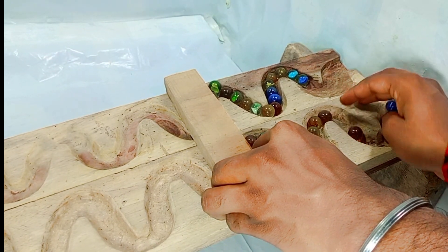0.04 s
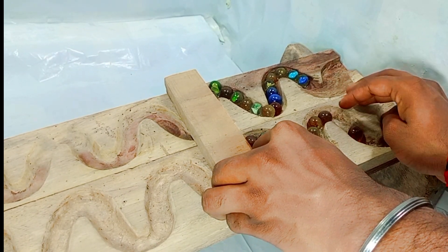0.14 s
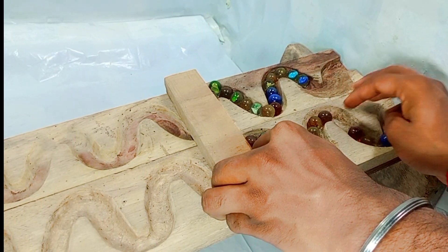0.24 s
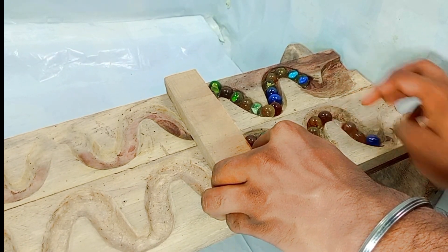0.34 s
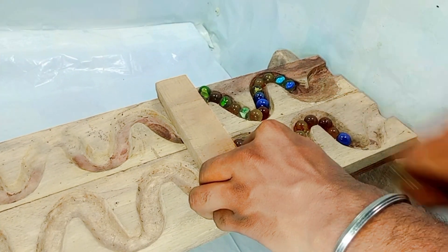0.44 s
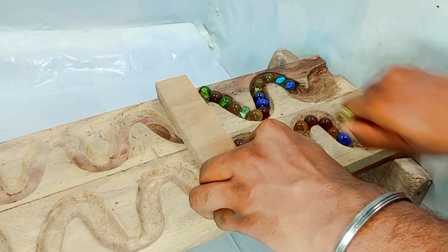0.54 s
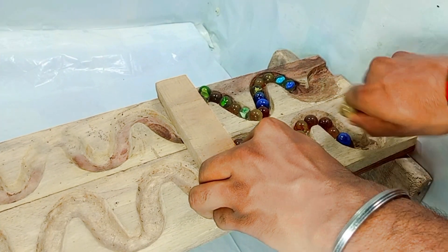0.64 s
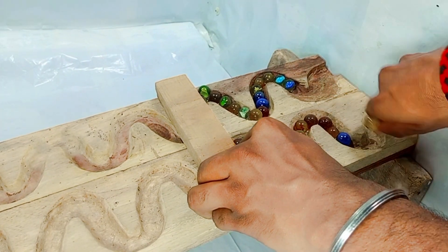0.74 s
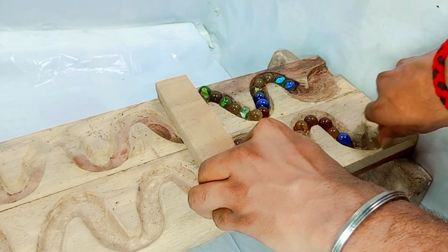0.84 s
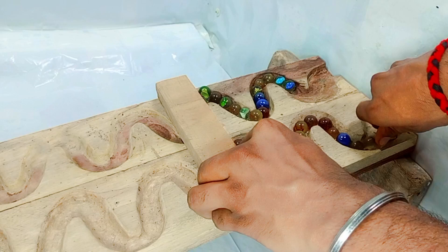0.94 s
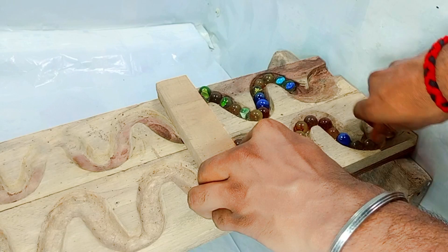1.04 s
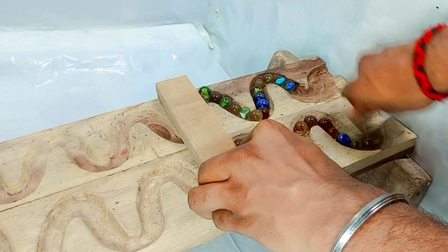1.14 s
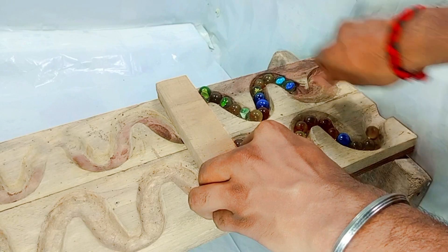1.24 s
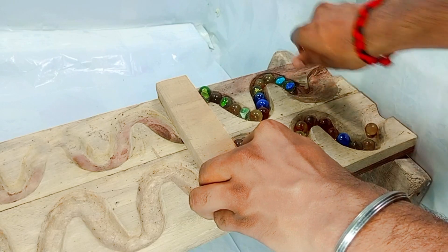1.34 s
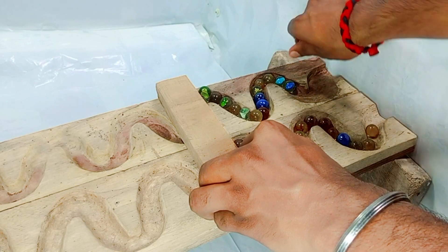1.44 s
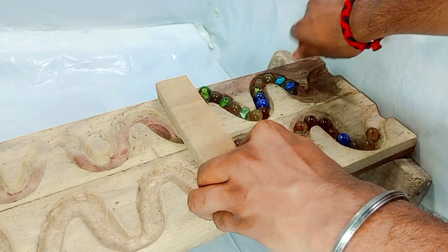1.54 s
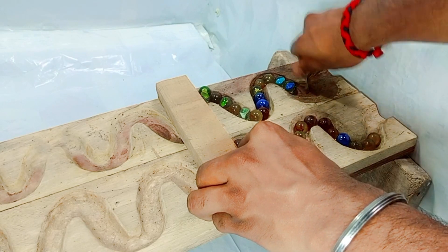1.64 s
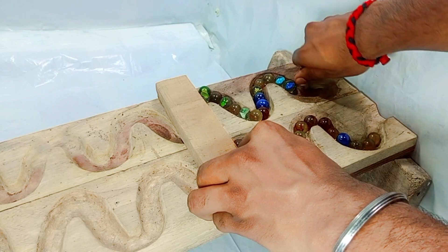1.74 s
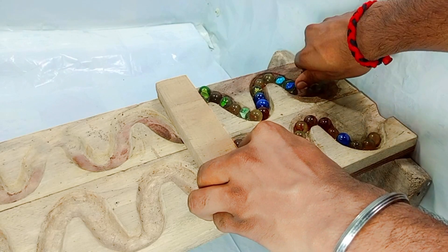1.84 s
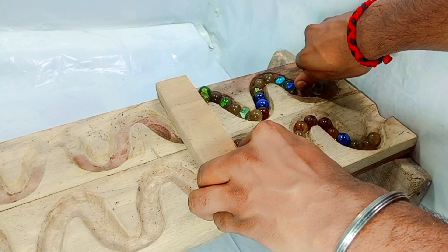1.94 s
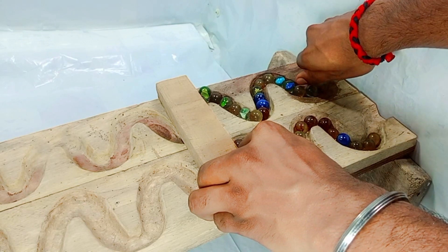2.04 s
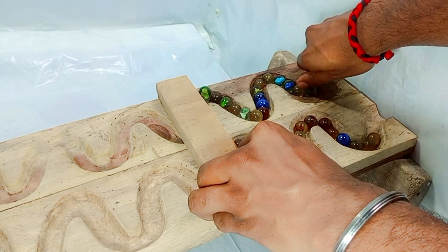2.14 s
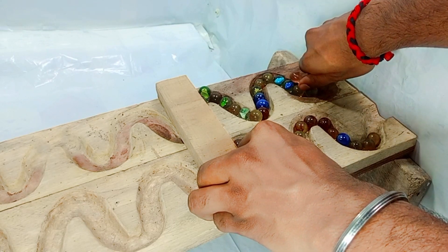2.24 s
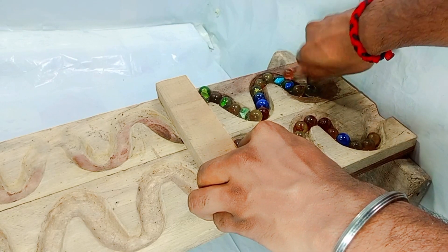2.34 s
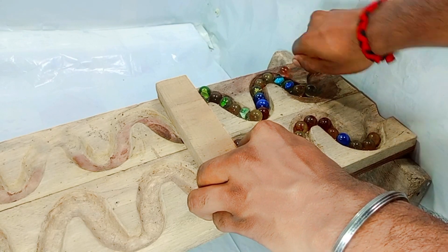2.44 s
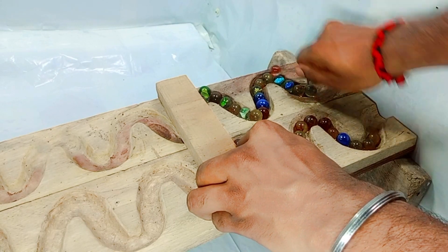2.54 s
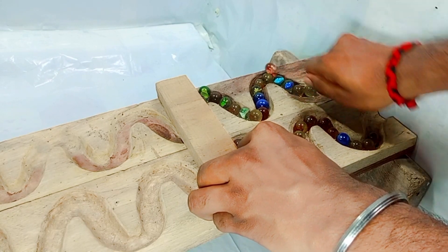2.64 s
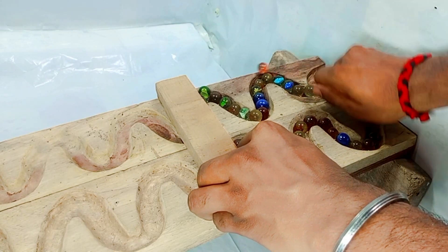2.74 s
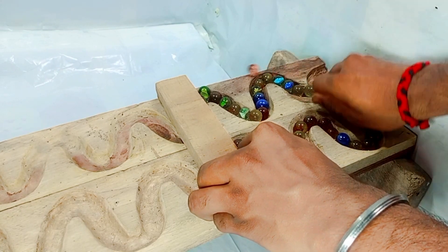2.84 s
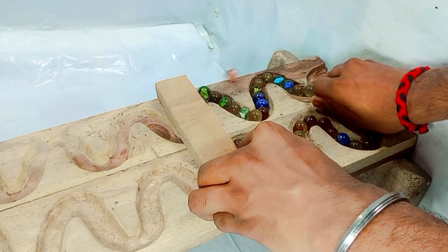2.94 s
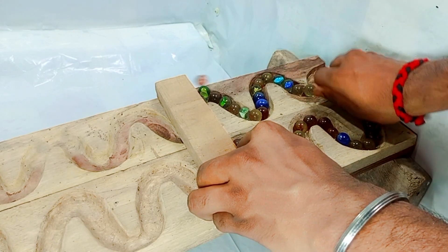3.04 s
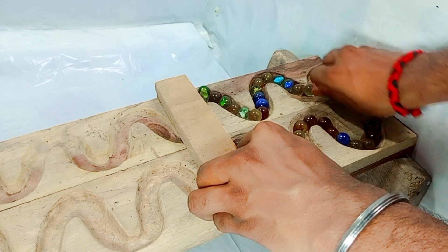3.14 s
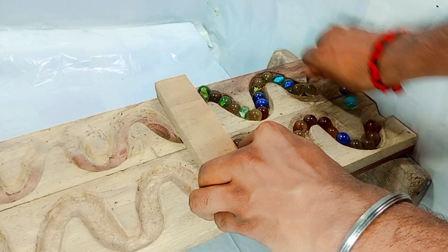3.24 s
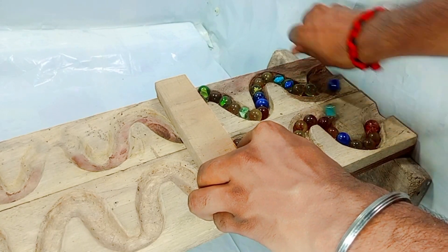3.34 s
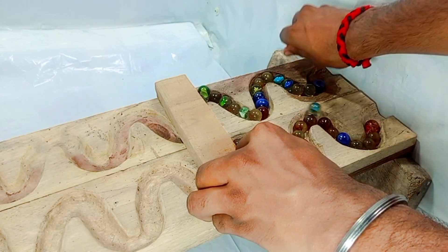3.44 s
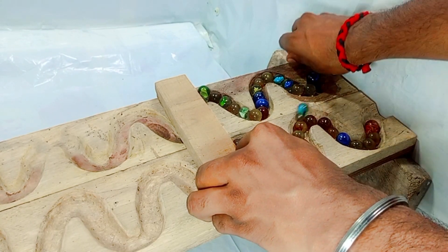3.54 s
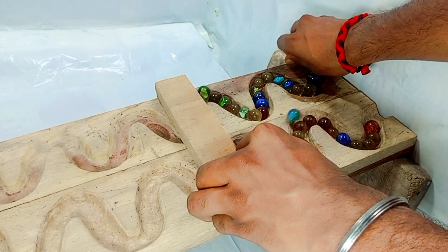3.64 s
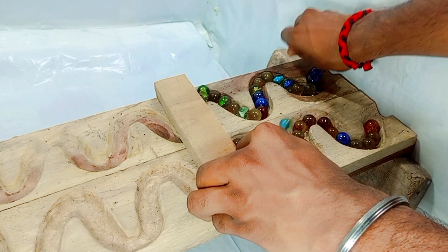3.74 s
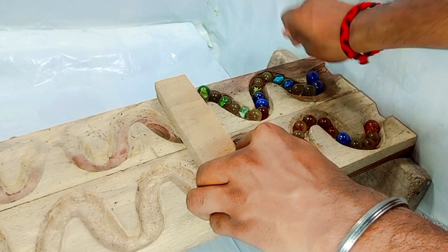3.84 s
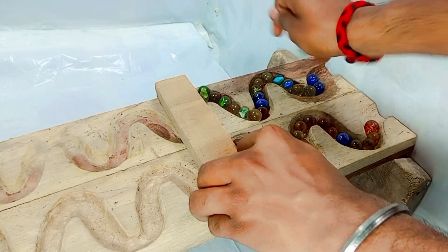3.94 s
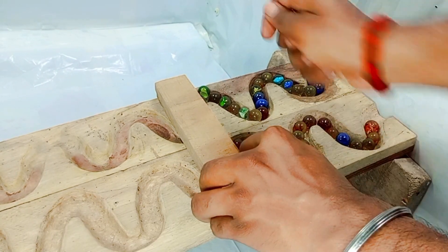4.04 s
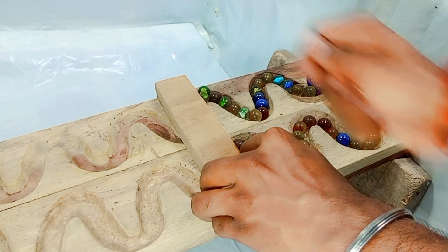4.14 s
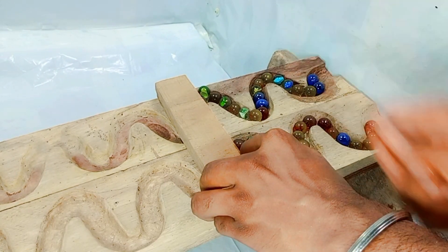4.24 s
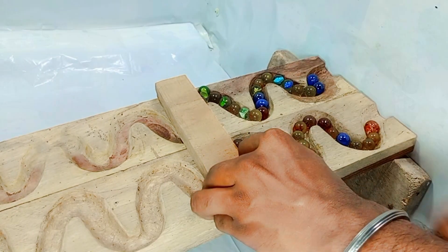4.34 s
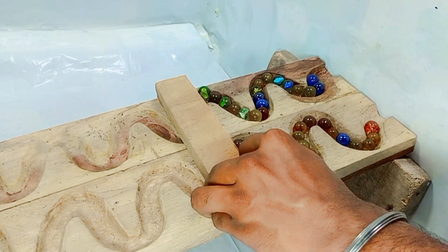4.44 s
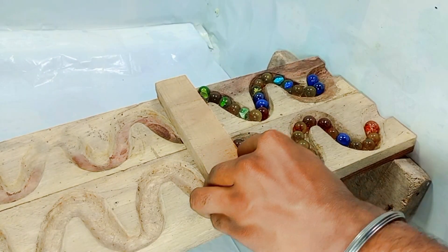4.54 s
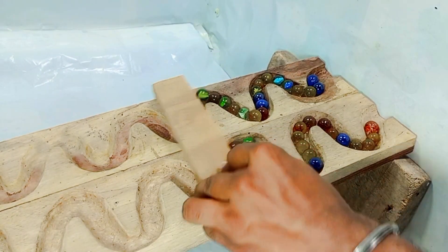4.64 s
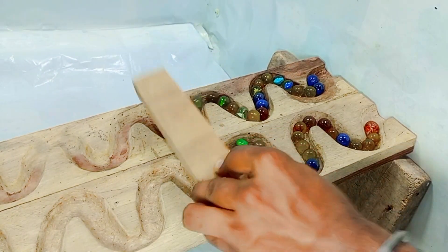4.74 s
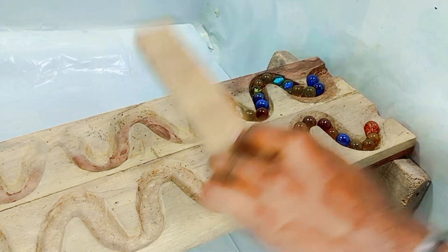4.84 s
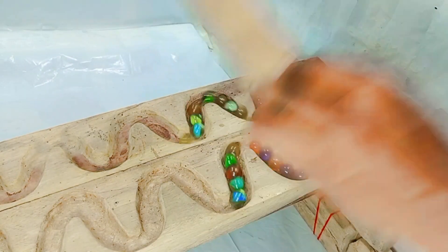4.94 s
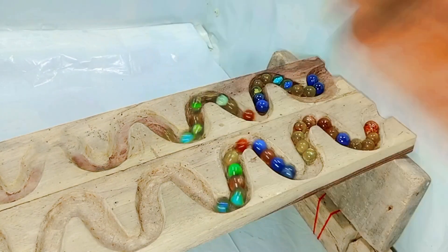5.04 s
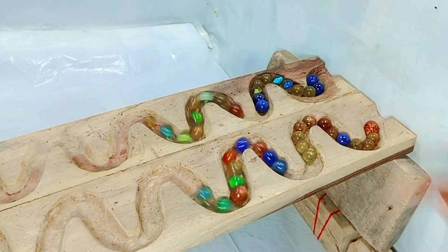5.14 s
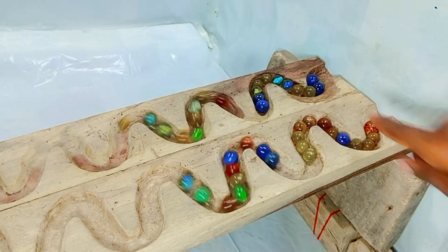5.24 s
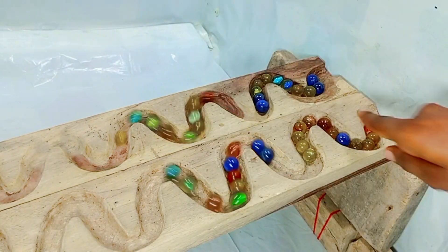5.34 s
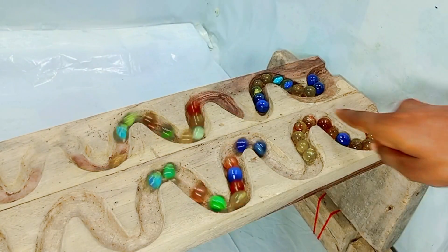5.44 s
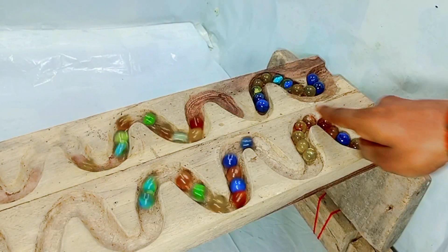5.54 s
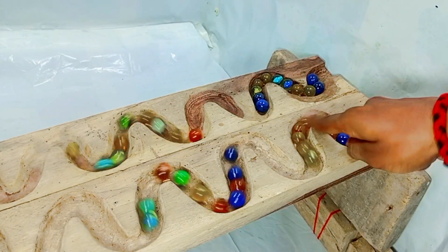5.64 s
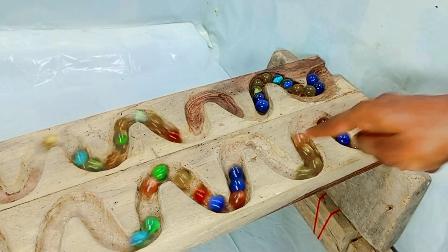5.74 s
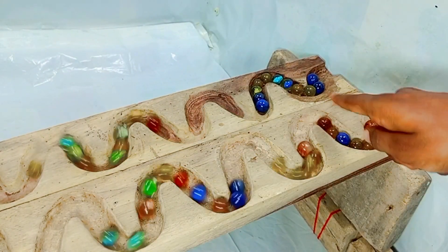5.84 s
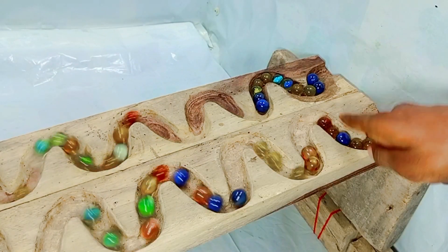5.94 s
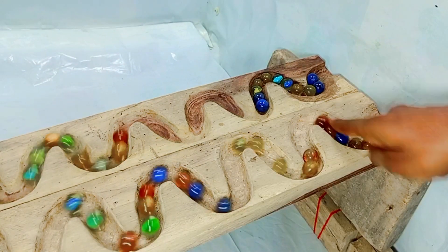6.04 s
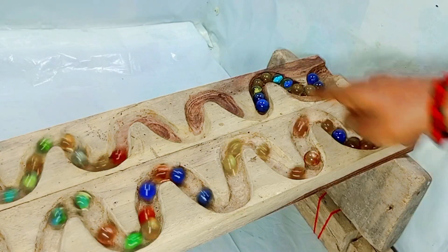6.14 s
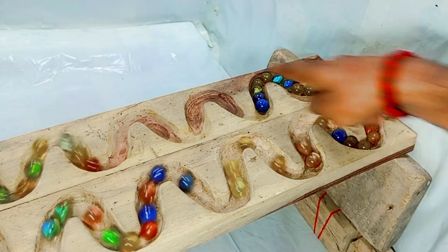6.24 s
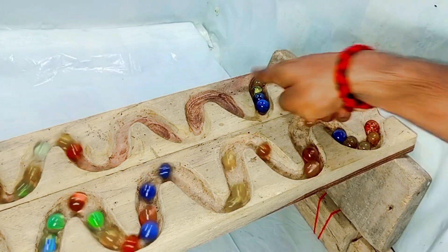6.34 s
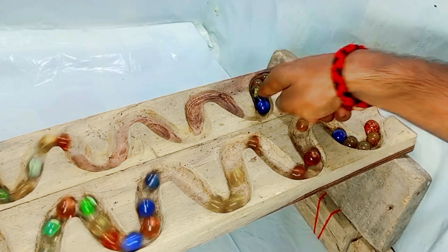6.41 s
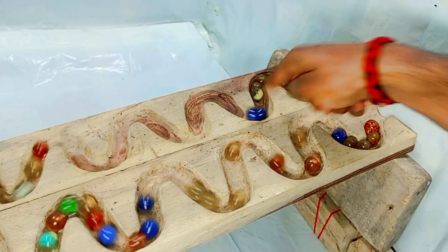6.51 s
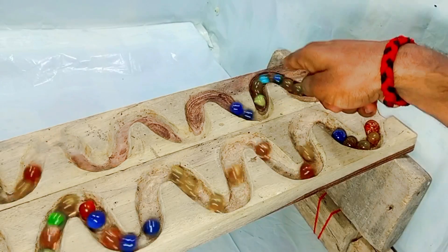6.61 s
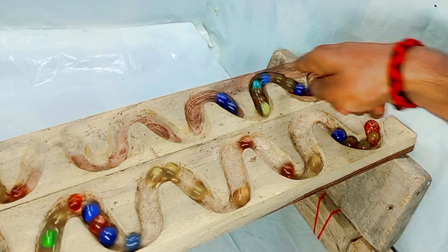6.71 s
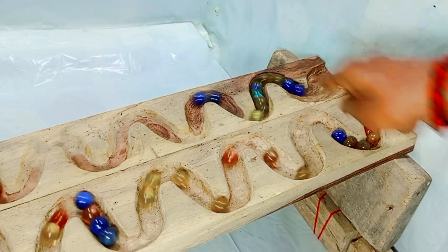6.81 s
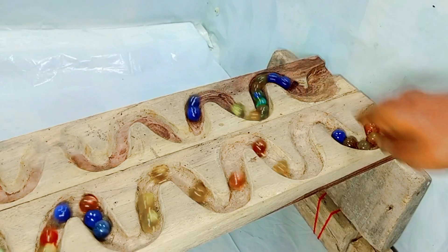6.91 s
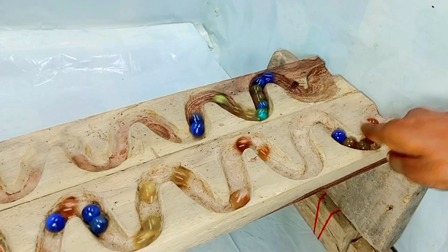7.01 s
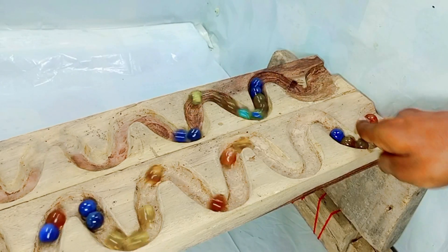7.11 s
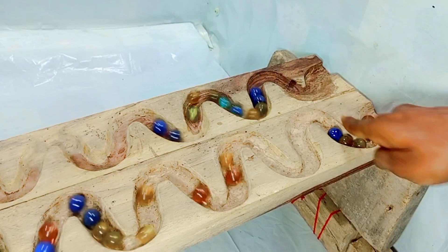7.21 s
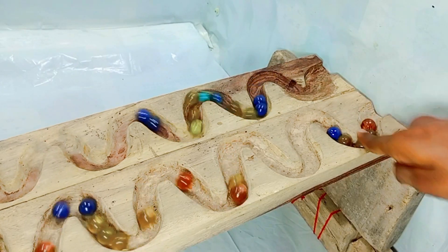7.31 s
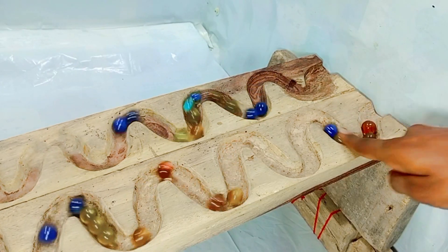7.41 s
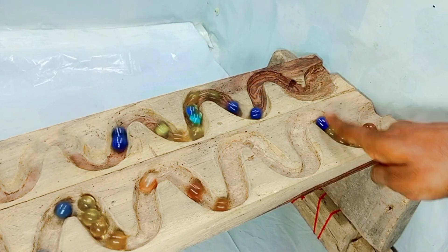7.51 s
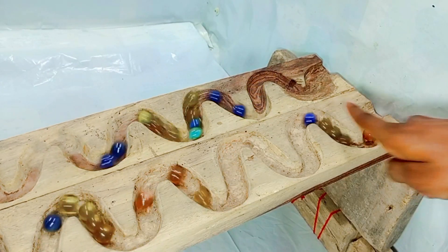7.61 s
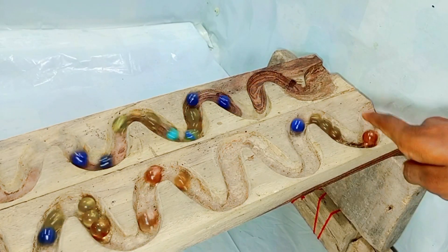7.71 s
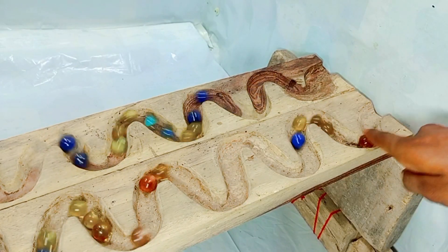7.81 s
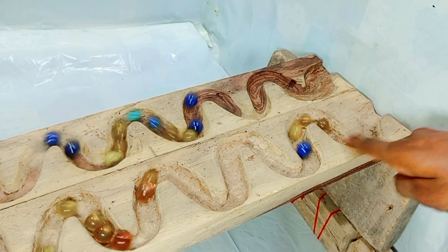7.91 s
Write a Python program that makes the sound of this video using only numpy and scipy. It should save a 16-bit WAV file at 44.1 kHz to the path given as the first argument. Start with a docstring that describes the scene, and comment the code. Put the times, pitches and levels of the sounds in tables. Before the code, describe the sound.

Glass marbles knock and click into a wooden track, then rumble down its grooves and clack off the far end.

```python
"""A small room, one microphone close to a sloping wooden board with wavy grooves.
Glass marbles are dropped in by hand: they bounce and set the wood ringing, roll a little over its grain
and click into the queue, while the spare ones grind in the palm. At 4.7 s the wooden gate is lifted and
the queues run down with a swelling rumble. From 6.7 s they fall off the far end one after another
and clack on the surface below."""
import sys
import numpy as np
from scipy import signal
from scipy.fft import rfft, irfft
from scipy.io import wavfile
from scipy.ndimage import uniform_filter1d, minimum_filter1d

SR = 44100
rng = np.random.default_rng(int(sys.argv[2]) if len(sys.argv) > 2 else 0)


def put_to_file(sound):
    """Save the sound as 16-bit audio at rate SR, in the file named by the first command-line argument."""
    columns = np.atleast_2d(sound).T  # one column per channel
    safe = np.clip(columns, -1, 1)
    whole_steps = np.round(safe * 32767)
    wavfile.write(sys.argv[1], SR, whole_steps.astype(np.int16))


N = 351477
TIME = np.arange(N) / SR
HIT_SIZE = 4096   # samples in one impact
TOP_HZ = 9500   # the top octave of the glass starts here


def from_db(db):
    """Decibels to gain."""
    return 10 ** (np.asarray(db) / 20)


def rms_one(x, size=None):
    """Scale each row to rms 1, over its first samples if a size is given."""
    return x / np.sqrt(np.mean(x[..., :size] ** 2, axis=-1, keepdims=True) + 1e-20)


def at_hz(points, hz):
    """Read a table on a log-frequency axis."""
    known_hz, values = np.transpose(points)
    return np.interp(np.log(hz + 1), np.log(known_hz), values)


def band(x, edges_hz, kind, order=3):
    """Butterworth filter."""
    return signal.sosfilt(signal.butter(order, edges_hz, kind, fs=SR, output="sos"), x + 1e-18)


def colour(x, spectrum):
    """Causal (minimum-phase) filter with the given spectrum."""
    gains = from_db(at_hz(spectrum, np.fft.rfftfreq(HIT_SIZE, 1 / SR)))
    cepstrum = irfft(np.log(gains))
    cepstrum[1:HIT_SIZE // 2] *= 2
    cepstrum[HIT_SIZE // 2 + 1:] = 0
    response = irfft(np.exp(rfft(cepstrum)))
    filtered = signal.fftconvolve(np.atleast_2d(x), response[None], axes=1)
    return filtered[:, :x.shape[-1]].reshape(x.shape)


def place(times, sounds):
    """Lay each sound at its time."""
    out = np.zeros(N + sounds.shape[1])
    for s, sound in zip(times, sounds):
        start = int(np.clip(s * SR, 0, N))
        out[start:start + len(sound)] += sound
    return out[:N]


def contacts(count, scatter_s, scatter_db):
    """One force pulse per hit, followed by its fast-dying reflections inside the body."""
    echoes = rng.standard_normal((count, HIT_SIZE)) * np.exp(-TIME[:HIT_SIZE] / scatter_s)
    force = from_db(scatter_db) * rms_one(echoes) / np.sqrt(HIT_SIZE)
    force[:, 0] += 1
    return force


def spread(x, gain):
    """Waves cross the body many times, smearing a pulse over a few milliseconds without colouring it."""
    for lag in (7, 17, 33):
        allpass = np.r_[1, np.zeros(lag - 1), gain]
        x = signal.lfilter(allpass[::-1], allpass, x)
    return x


def grains(per_s, spread_db):
    """Random tiny impacts, mostly weak and a few strong; rms 1."""
    sizes = from_db(spread_db * np.minimum(rng.exponential(1, N), 4)) * rng.choice([-1, 1], N)
    return rms_one(sizes * (rng.random(N) < per_s / SR))


def flutter(depth_db, span_s):
    """A gain that swells and sags at random over the given time."""
    size = int(span_s * SR)
    drift = uniform_filter1d(uniform_filter1d(rng.standard_normal(N), size), size)
    return from_db(depth_db * rms_one(drift))


# The dense, quickly damped response of the wood. Each row: frequency in Hz, gain in dB.
WOOD_SPECTRUM = [(50, -40), (110, -24.5), (200, -8.5), (400, -10), (650, 3), (1100, 2.5), (1600, 0.5),
                 (2300, -5.5), (3200, -4.5), (4200, -14.5), (5000, -21), (6800, -28), (8500, -41.5),
                 (16000, -62.5)]

def wood(force, modes):
    """The damped broad response of wood, over which a few resonances ring longer."""
    x = colour(force, WOOD_SPECTRUM)
    for hz, width_hz, lift_db in modes:
        radius = np.exp(-np.pi * width_hz / SR)
        feedback = [1, -2 * radius * np.cos(2 * np.pi * hz / SR), radius ** 2]
        ringing = signal.lfilter([1, 0, -1], feedback, x) * (1 - radius ** 2) / 2
        x = x + (from_db(lift_db) - 1) * ringing
    return x


# Single marbles roll down to the queue. Each row: time of greatest speed in seconds,
# relative level then in dB, initial rate of settling in dB per second.
LONE_ROLLS = [(0.0, -38, 151), (0.25, -39, 55), (0.93, -29.5, 79.5), (1.32, -33.5, 123), (1.665, -56, 98),
              (1.88, -38.5, 65), (2.22, -44.5, 50), (2.57, -39.5, 130), (2.81, -49, 50), (2.96, -32, 125.5),
              (3.21, -35.5, 99.5), (3.4, -32, 110), (3.6, -35.5, 84.5), (3.838, -44.5, 75),
              (4.0, -47.5, 150)]

def lone_level():
    """Each placed marble gathers speed, then settles ever faster to a stop."""
    gather_db_per_s, brake_s = 274, 0.075   # after brake_s it dies away twice as fast
    level = 0
    for s, db, settle_db_per_s in LONE_ROLLS:
        before_s, after_s = np.maximum(s - TIME, 0), np.maximum(TIME - s, 0)
        settled_db = settle_db_per_s * (after_s + after_s ** 2 / (2 * brake_s))
        level = level + from_db(db - np.minimum(gather_db_per_s * before_s + settled_db, 150))
    return level


def queue_level():
    """The rumble sets in as the gate slides off, and the queues speed up towards a steady run."""
    gate_s, opening_db_per_s = 4.677, 333
    start_db, run_db, speedup_s = -42.5, -23.5, 0.64
    running_s, waiting_s = np.maximum(TIME - gate_s, 0), np.maximum(gate_s - TIME, 0)
    speed_db = run_db + (start_db - run_db) * np.exp(-running_s / speedup_s)
    return from_db(speed_db - opening_db_per_s * waiting_s)


# Resonances (+) and gaps (-) heard in the knocks and rolling: a few narrow low tones, then the
# board's ring. Each row: frequency in Hz, width in Hz, lift in dB.
RESONANCES = [(258, 8.3, 2), (348, 12, 6.5), (384.2, 20, 10.5), (456, 66, 4.5), (614, 70, 1.5),
              (735, 160, 1.5), (1314, 64, 12), (1964, 170, 16), (2120, 100, -6.5), (2624, 110, 18),
              (3680, 150, 12.5)]
# The colour of a rolling contact against a sharp blow. Each row: frequency in Hz, gain in dB.
ROLL_SPECTRUM = [(100, 5), (330, 6.5), (700, 3), (2600, -4), (4000, -10), (7000, 5), (15000, 12.5)]

def groove_rumble():
    """Marbles ride over the grain of the wood, a stream of tiny impacts, and bump the groove walls."""
    pressure = flutter(depth_db=2.2, span_s=0.014)
    grain_contacts = colour(pressure * grains(per_s=1200, spread_db=3.0), ROLL_SPECTRUM)
    over_grain = rms_one(wood(band(grain_contacts, 4200, "low", order=8), RESONANCES))
    wall_contacts = band(grains(per_s=50, spread_db=1.5), [900, 5000], "band")
    on_walls = rms_one(wood(spread(wall_contacts, gain=0.77), RESONANCES))
    return from_db(0.24) * rms_one(over_grain + from_db(-5) * on_walls)


# A glass click, heard close. Each row: frequency in Hz, gain in dB.
GLASS_SPECTRUM = [(300, -14), (1200, 12.5), (3000, 11), (5000, -2), (7000, -0.5), (8300, -12),
                  (10000, -22.5), (15000, -23)]

def ticks(per_s, spread_db):
    """Random light touches of glass on glass; rms 1."""
    touch = spread(contacts(1, scatter_s=0.009, scatter_db=1.0), gain=0.3)[0]
    touches = signal.fftconvolve(grains(per_s, spread_db), touch)[:N]
    return rms_one(colour(touches, GLASS_SPECTRUM))


def jostle():
    """Rolling marbles nudge each other with sparse, soft ticks."""
    return from_db(-23) * band(ticks(per_s=22, spread_db=2.0), 8300, "low", order=8)


def with_rebounds(hits, gap_s, gap_spread, loss_db):
    """Each blow is followed by one weaker hop after an uneven gap."""
    hits = np.array(hits)
    gap_jitter, loss_jitter = rng.uniform(-1, 1, (len(hits), 2)).T
    hop_s = hits[:, 0] + gap_s * np.exp(gap_spread * gap_jitter)
    hop_db = hits[:, 1:] - loss_db - 2 * loss_jitter[:, None]
    return np.r_[hits, np.c_[hop_s, hop_db]]


def blows(hits, bodies, thud_trim_db, edge_trim_db):
    """Where and how hard a marble lands sets the balance of low thud, ring and bright edge."""
    bands_hz = [300, 1500], [1500, 3200], [3400, 8000]   # thud, ring, edge
    attack_size, crest_db = 353, 9.5   # the first 8 ms; how far the peak stands above their mean
    sounds = []
    for (_, ring, thud, edge), body in zip(hits, bodies):
        attack_power = [np.mean(band(body[:attack_size], hz, "band") ** 2) for hz in bands_hz]
        wanted_db = np.array([thud + thud_trim_db, ring - crest_db, edge + edge_trim_db])
        low, mid, high = wanted_db - 10 * np.log10(attack_power)
        balance = [(150, (low + mid) / 2), (450, low), (1100, low),
                   (1800, mid), (2900, mid), (3700, high)]
        sounds.append(colour(body, balance))
    return place(hits[:, 0], np.array(sounds))


# Marbles strike the board, close to the microphone. Each row: start in seconds, then relative
# levels in dB of the ring's peak, the thud below it and the bright edge above it.
BOARD_KNOCKS = [(0.0868, -9, -21.5, -18), (0.1173, -9, -26.5, -25.5), (0.1386, -10.5, -32, -23),
                (0.1533, -15, -28.5, -37), (0.1737, -16.5, -39, -39.5), (0.1865, -19, -25.5, -43),
                (0.2328, -18, -30, -40), (0.3061, -20, -30.5, -42.5), (0.7582, -24, -37, -36),
                (0.844, -14, -22, -29), (0.8511, -10.5, -22.5, -24), (0.8936, -14.5, -32, -30),
                (0.9131, -14.5, -22, -22.5), (0.9269, -7, -18.5, -26), (0.9809, -14, -33, -28),
                (1.0215, -19, -28, -36), (1.1497, -29, -39.5, -37.5), (1.1633, -12.5, -23.5, -19.5),
                (1.2352, -23.5, -29, -38.5), (1.275, -23.5, -34.5, -33.5), (1.7426, -11.5, -15, -27),
                (1.7733, -10.5, -26, -25), (1.8298, -9.5, -19.5, -22.5), (1.856, -8.5, -12.5, -21.5),
                (1.923, -19, -23, -40.5), (2.1318, -14, -22.5, -36.5), (2.147, -14.5, -24.5, -32),
                (2.185, -17, -25, -35), (2.2114, -20, -49, -37), (2.2351, -23.5, -30.5, -41),
                (2.3533, -30, -37.5, -66), (2.4982, -21.5, -26.5, -34), (2.5502, -24.5, -27, -42),
                (2.7656, -40.5, -37.5, -45), (2.8399, -6, -14, -20), (2.8777, -7.5, -21.5, -20),
                (2.9413, -12.5, -24, -32.5), (3.1377, -32, -39.5, -37), (3.1641, -13.5, -15.5, -23),
                (3.2018, -14.5, -24, -35), (3.2225, -16, -11.5, -33), (3.262, -18.5, -21.5, -34.5),
                (3.3328, -16, -23, -28.5), (3.3787, -30.5, -18.5, -49), (3.4291, -22.5, -20.5, -43.5),
                (3.5416, -5.5, -15.5, -19.5), (3.673, -24.5, -36.5, -36.5), (3.8287, -19, -29.5, -30.5),
                (3.9362, -17.5, -27.5, -33.5), (3.9801, -14, -29.5, -31.5), (4.0415, -14, -49.5, -29),
                (4.1643, -36, -66.5, -75), (4.6867, -8, -19, -19.5), (4.758, -10.5, -24, -21),
                (4.8015, -14.5, -25, -28), (5.6617, -13, -19, -20.5), (6.0135, -16, -24, -21),
                (6.6289, -9.5, -36.5, -22)]

def knocks():
    """Marbles bounce and ring the board; the light, brief contact gives little bass, no top octave."""
    held_pitch = 1.023   # the board rings slightly higher with the hand pressing the gate on it
    width_share = 0.91   # free of rolling marbles, the modes are narrower
    blow_db, spot_db = -0.5, 0.93   # shift of each mode's lift; its variation with the spot struck
    hits = with_rebounds(BOARD_KNOCKS, gap_s=0.026, gap_spread=0.29, loss_db=16.5)
    forces = spread(contacts(len(hits), scatter_s=0.006, scatter_db=-2.5), gain=0.56)
    forces = band(band(forces, 370, "high"), 7000, "low", order=8)
    hz, width_hz, lift_db = np.transpose(RESONANCES)
    lifts = lift_db + blow_db + spot_db * rng.standard_normal((len(hits), len(hz)))
    bodies = [wood(force, zip(held_pitch * hz, width_share * width_hz, lift))
              for force, lift in zip(forces, lifts)]
    return blows(hits, bodies, thud_trim_db=-3.5, edge_trim_db=-3.5)


# Marble meets marble, heard close. Each row: start in seconds, then relative levels in dB
# of the click and of its top octave.
GLASS_CLICKS = [(0.2512, -33.5, -66), (0.5691, -44, -88), (0.6729, -35, -70), (0.7133, -40.5, -84),
                (0.7606, -41, -74), (0.9186, -25, -52.5), (0.9572, -29.5, -54.5), (1.1614, -25.5, -77),
                (1.3182, -28.5, -54), (2.05, -36.5, -50.5), (2.482, -31.5, -57), (2.4982, -35.5, -54),
                (2.5518, -30.5, -63), (2.616, -31, -68), (3.0031, -29, -56), (3.2025, -23.5, -44.5),
                (3.333, -33, -53), (3.3807, -23, -48.5), (3.4905, -33, -72), (3.5728, -30, -66),
                (3.8332, -37.5, -58), (4.0534, -37.5, -69), (4.723, -32.5, -61), (5.2353, -30, -74),
                (5.368, -33, -63), (6.272, -27, -56), (7.7291, -18, -44)]

def clicks():
    """Glass on glass: a very brief contact, bright up to the top octave."""
    start_s, click_db, top_db = np.transpose(GLASS_CLICKS)
    attack_size = 176   # the first 4 ms
    forces = spread(contacts(len(start_s), scatter_s=0.004, scatter_db=0.5), gain=0.5)
    snap = colour(forces, GLASS_SPECTRUM)
    main = rms_one(band(snap, TOP_HZ, "low", order=5), attack_size) * from_db(click_db + 1.5)[:, None]
    sparkle = rms_one(band(snap, TOP_HZ, "high", order=5), attack_size) * from_db(top_db + 3.5)[:, None]
    return place(start_s, main + sparkle)


# Fingers shuffle the spare marbles. Each row: start and end in seconds, relative level in dB.
PALM_SHUFFLES = [(0.44, 0.804, -52.5), (1.26, 1.36, -44), (1.659, 1.676, -40), (2.444, 2.647, -42.5),
                 (3.20, 3.25, -53.5), (3.376, 3.449, -51), (4.90, 5.055, -65)]

def shuffling():
    """Marbles grind together in the palm: an uneven rub with a few small glass ticks."""
    grip = sum(from_db(db) * ((TIME > start) & (TIME < end)) for start, end, db in PALM_SHUFFLES)
    rub = flutter(depth_db=6, span_s=0.015) * ticks(per_s=1200, spread_db=1.5)
    grinding = from_db(-7) * band(rub, 5000, "low", order=2)
    ticking = from_db(-3.5) * band(ticks(per_s=45, spread_db=2.5), 9000, "low", order=1)
    return uniform_filter1d(grip, size=800) * (grinding + ticking)


# The hand bumps the board, faint even this close. Each row: start in seconds, level in dB.
HAND_BUMPS = [(1.315, -52), (1.344, -51), (2.492, -55.5), (2.546, -60.5), (5.481, -54), (6.301, -53)]

def bumps():
    """Soft flesh on wood leaves only a low thump."""
    start_s, level_db = np.transpose(HAND_BUMPS)
    forces = contacts(len(start_s), scatter_s=0.025, scatter_db=12)
    thumps = band(forces, [105, 260], "band", order=2)
    return place(start_s, rms_one(thumps, HIT_SIZE // 2) * from_db(level_db)[:, None])


def pings():
    """Now and then a running marble hops and lands hard, ringing the upper modes of the board."""
    hops = band(grains(per_s=9, spread_db=1.0), [2300, 5000], "band", order=2)
    return from_db(-10) * rms_one(wood(spread(hops, gain=0.6), RESONANCES))


def clinks():
    """Running neighbours catch up and touch: lone, bright ticks."""
    return from_db(-20) * band(ticks(per_s=14, spread_db=2.0), [2600, 10500], "band", order=2)


# The surface below the far end of the track, its broad resonances (+) and gaps (-).
# Each row: frequency in Hz, width in Hz, lift in dB.
LANDING_MODES = [(192, 15, 8), (400, 35, 5.5), (808, 120, 10), (1490, 730, 15.5), (1986, 73, -3),
                 (2450, 150, -2.5)]

def landing_rumble():
    """Fallen marbles roll on beyond the track, with fewer and more uneven tiny impacts."""
    force = colour(grains(per_s=770, spread_db=5.0), ROLL_SPECTRUM)
    return from_db(-4) * rms_one(wood(force, LANDING_MODES))


def clatter():
    """Fallen marbles knock together; their finest ticks crackle in the top octave."""
    knocking = from_db(-22) * ticks(per_s=85, spread_db=-1.0)
    crackle = from_db(-43.5) * rms_one(band(grains(per_s=97, spread_db=5.0), TOP_HZ, "high"))
    return knocking + crackle


# Marbles fall off the far end. Each row: start in seconds, then relative levels in dB
# of the ring's peak, the thud and the bright edge.
END_DROPS = [(6.6683, -4, -27, -28.5), (6.7448, -7, -15, -28), (6.8051, 0.5, -13, -23),
             (6.899, -3, -20, -30.5), (6.9697, -2.5, -14, -21.5), (7.0436, -1.5, -18, -27.5),
             (7.1492, -2, -16, -25.5), (7.2375, -2, -15, -21.5), (7.3157, -3.5, -13, -26.5),
             (7.3943, -3, -25, -32.5), (7.4837, 0.5, -11.5, -24), (7.6259, 2, -10, -24),
             (7.7307, -1.5, -18, -28), (7.8338, -9, -15.5, -27.5), (7.908, -7.5, -51, -26)]

def drops():
    """Falling marbles land with a shorter, duller clack and strike again at once."""
    hits = with_rebounds(END_DROPS, gap_s=0.015, gap_spread=0.2, loss_db=9.5)
    forces = spread(contacts(len(hits), scatter_s=0.0028, scatter_db=2.5), gain=0.51)
    return blows(hits, wood(forces, LANDING_MODES), thud_trim_db=-1.3, edge_trim_db=-1.0)


# The small room around the microphone. Each row: frequency in Hz, relative level in dB,
# time to die away by 60 dB in seconds.
ROOM_DECAY = [(202, 4, 0.089), (455, 8, 0.27), (900, 2, 0.32), (2100, -12.5, 0.47), (5500, -1.5, 0.2),
              (14000, 1, 0.058)]

def room(x, first_echo_s):
    """Diffuse reflections, fullest in the low middle, that die soonest in the high treble."""
    t, tail = TIME[:SR // 2], 0
    edges_hz = np.geomspace(80, 18000, 11)
    hz, level_db, t60_s = np.transpose(ROOM_DECAY)
    for low, high in zip(edges_hz, edges_hz[1:]):
        noise = band(rng.standard_normal(len(t)), [low, high], "band", order=2)
        centre_hz = np.sqrt(low * high)
        decay_db = 60 * t / at_hz(np.c_[hz, t60_s], centre_hz)
        tail = tail + noise * from_db(at_hz(np.c_[hz, level_db], centre_hz) - decay_db)
    onset = np.clip(t / first_echo_s - 1, 0, 1)
    return signal.fftconvolve(x, rms_one(tail * onset) / np.sqrt(len(t)))[:N]


# The quiet of the room. Each row: frequency in Hz, relative level in dB.
AIR_SPECTRUM = [(40, -2), (280, -11), (500, -10), (1400, -13.5), (5000, -33.5), (16000, -36)]

def room_tone():
    """A faint, steady noise, strongest in the bass."""
    return from_db(-78) * rms_one(colour(rng.standard_normal(N), AIR_SPECTRUM))


def scene():
    """Wood and glass at one close microphone, with the quiet room behind them."""
    lone, queue = lone_level(), queue_level()
    spilled = 0.67 * np.clip((TIME - 6.52) / 0.36, 0, 1)   # share of marbles rolling beyond the track
    rumble = np.sqrt(1 - spilled) * groove_rumble() + np.sqrt(spilled) * landing_rumble()
    lone_rolls = band(lone * rumble, 357, "high", order=5)
    queue_run = band(queue * rumble, 160, "high", order=1)   # a whole queue draws deeper notes
    rolling_glass = (lone + queue) * (jostle() + spilled * clatter())
    timber = lone_rolls + queue_run + knocks() + drops() + queue * pings() + bumps()
    glass = rolling_glass + clicks() + shuffling() + queue * clinks()
    echoes = room(from_db(-14.5) * timber + from_db(-12) * glass, first_echo_s=0.0018)
    dip_db = -24 * ((TIME > 0.414) & (TIME < 0.476))   # the level dips briefly
    dip = uniform_filter1d(from_db(dip_db), size=100)
    return (dip * (timber + glass + echoes) + room_tone())[None]


def record(dry):
    """A fast limiter holds the loudest peaks; the deep bass and the top are cut."""
    ceiling, cutoff_hz = 0.7, 15800
    needed_gain = ceiling / np.maximum(np.abs(dry), ceiling)
    gain = uniform_filter1d(minimum_filter1d(needed_gain, size=90), size=90)
    top_cut = signal.ellip(10, 0.1, 80, cutoff_hz, fs=SR, output="sos")
    return signal.sosfilt(top_cut, band(dry * gain, 40, "high", order=2))


dry = scene()
out = record(dry)
put_to_file(out)
```